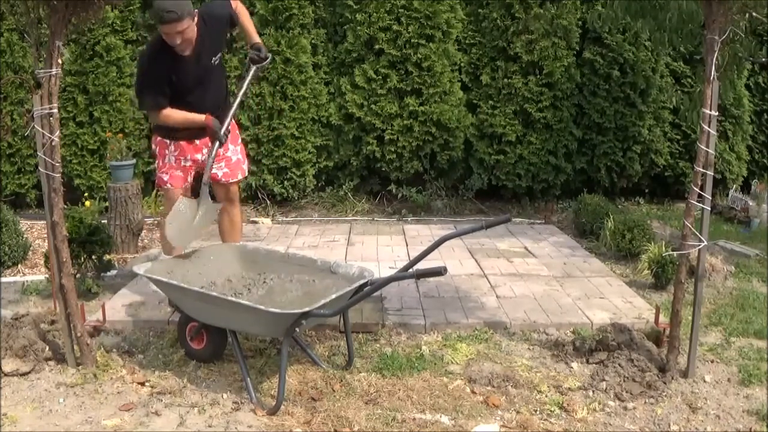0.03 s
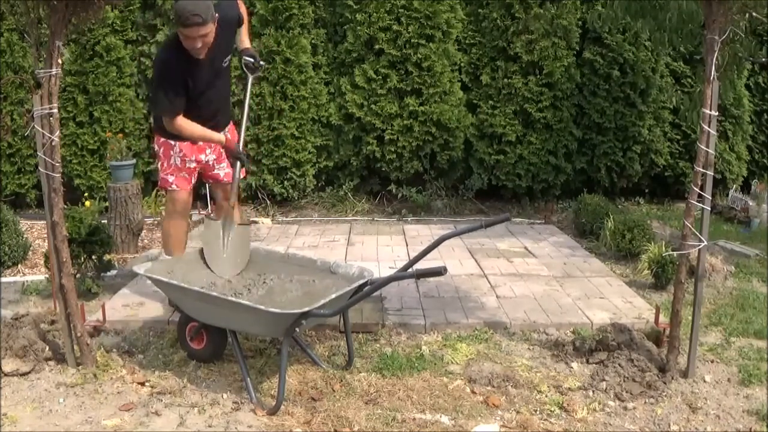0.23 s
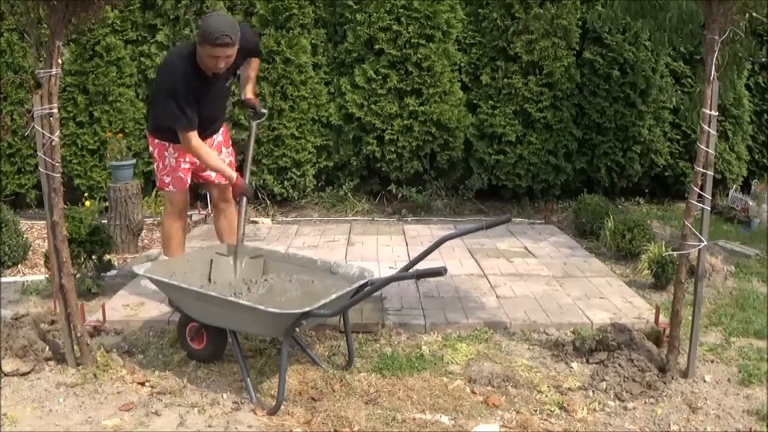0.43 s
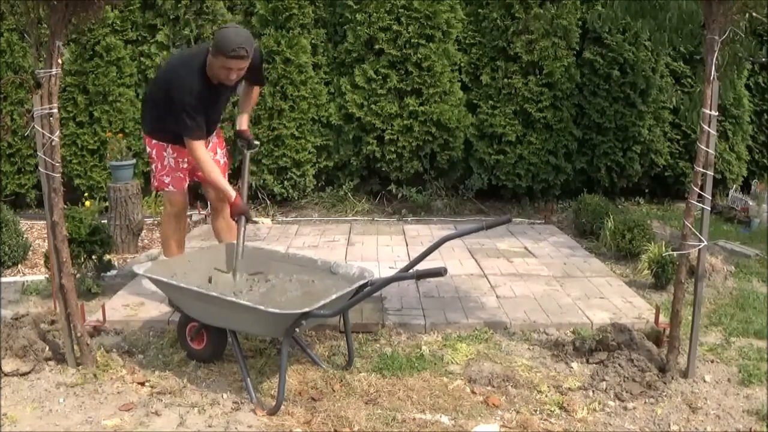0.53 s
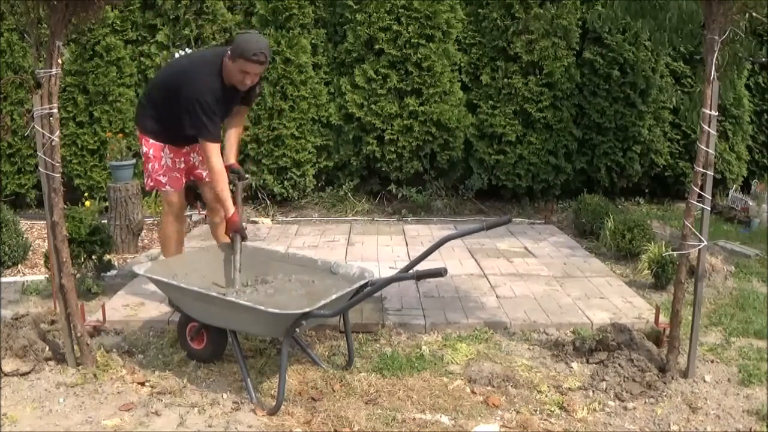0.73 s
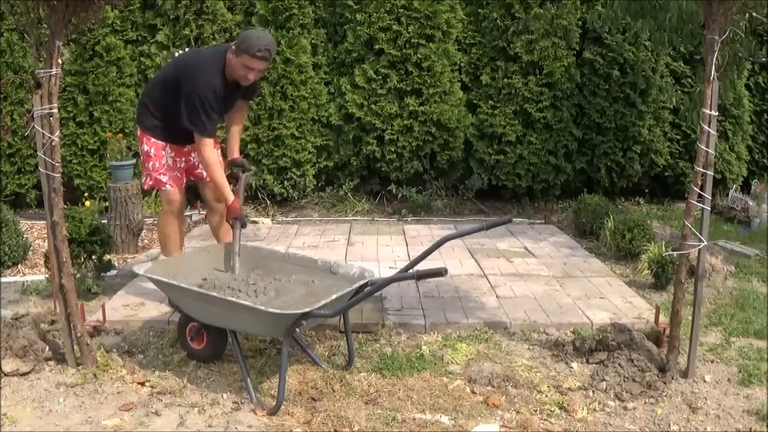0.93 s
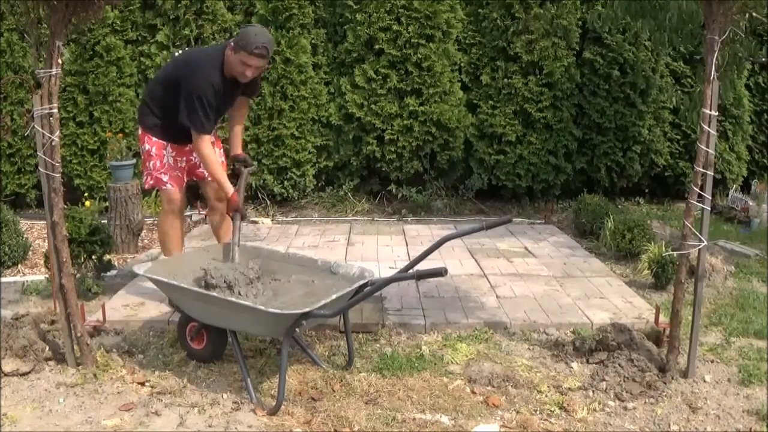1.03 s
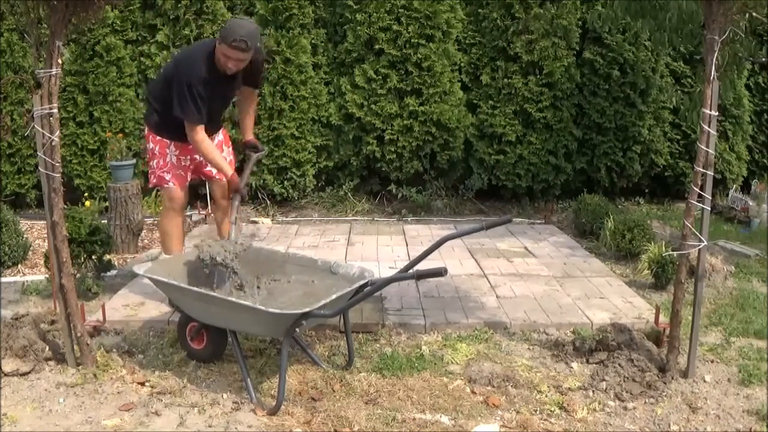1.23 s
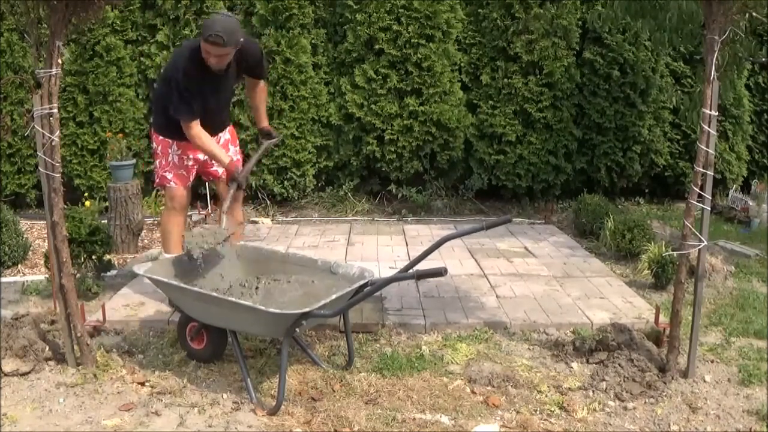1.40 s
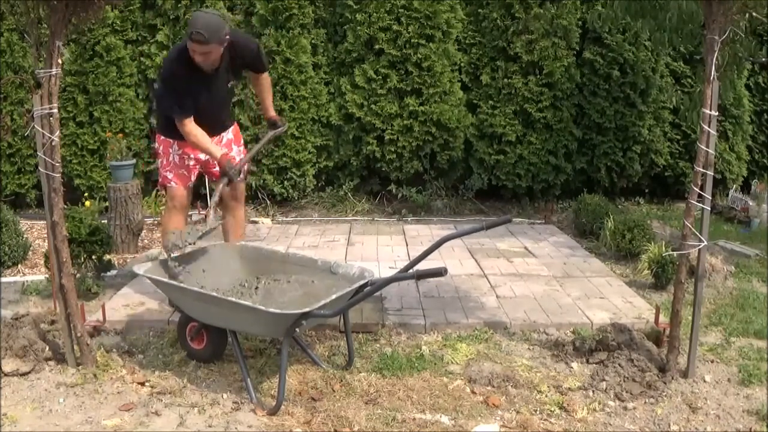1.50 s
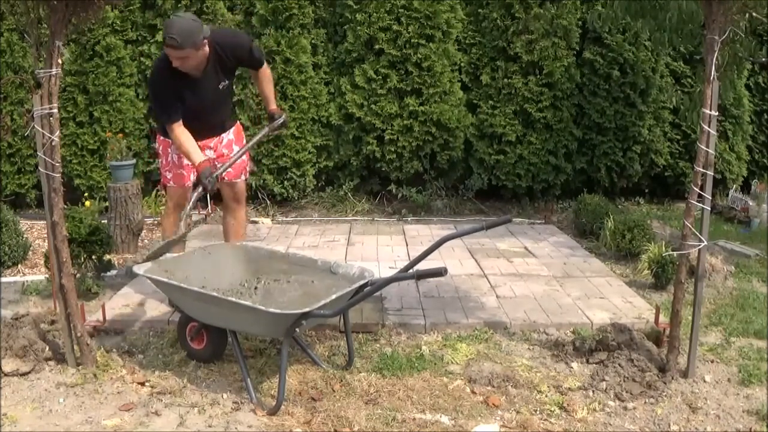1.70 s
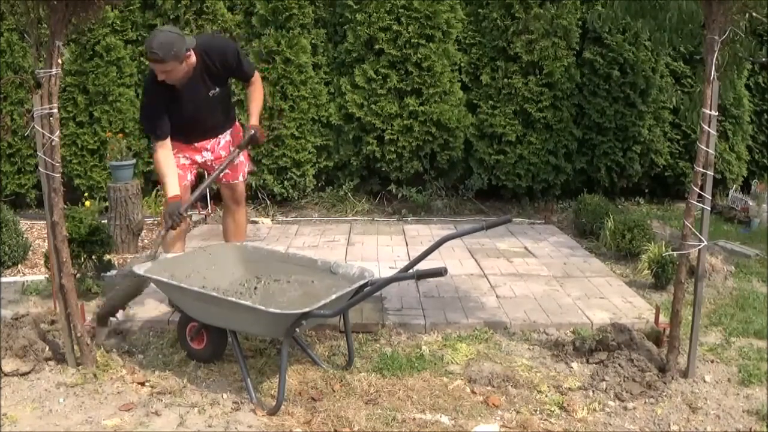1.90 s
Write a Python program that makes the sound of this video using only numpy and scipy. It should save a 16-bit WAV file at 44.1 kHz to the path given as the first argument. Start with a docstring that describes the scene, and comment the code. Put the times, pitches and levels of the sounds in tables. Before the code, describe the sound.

A steel shovel scrapes gritty wet concrete in a wheelbarrow, then lumps slap and knock back

```python
"""Shovel in wet concrete

A steel shovel stabs into wet concrete in a wheelbarrow and drags through it. Grit rasps on the blade as
clumpy noise, and an air pocket behind it gulps in short tone bursts that rise a little, then sink.
The mix keeps trickling as soft noise; lumps and stones slap back as noise bursts with ringing tray thuds.
Around it lie a short yard echo and a garden: hiss, birds made of wavering tones, and a faint sinking hum.
"""
import sys
import numpy as np
from scipy import signal
from scipy.fft import rfft, irfft, next_fast_len
from scipy.io import wavfile
from scipy.ndimage import uniform_filter1d, map_coordinates

SR = 44100
rng = np.random.default_rng(int(sys.argv[2]) if len(sys.argv) > 2 else 0)


def master_out(mix):
    """Clip the mix to full scale and print it as 16-bit PCM to the path in sys.argv[1]."""
    frames = np.transpose(np.atleast_2d(mix))
    ceiling = np.clip(frames, -1, 1)
    pcm = np.round(ceiling * 32767).astype(np.int16)
    wavfile.write(sys.argv[1], SR, pcm)


def linear_from_db(decibels):
    """Turn decibels (scalar or array-like) into linear amplitude factors; 0 gives 1."""
    return 10 ** (np.asarray(decibels, float) / 20)


N = 85995  # length of the sound in samples

# The shovel stroke: start_s, grit_level_db, treble_over_grit_db, pocket_over_grit_db, pocket_pitch_hz
STROKE = [(.211, -42, -17, -12, 744), (.2155, -27, 15, -56, 760), (.223, -18.5, 3, -46, 760),
          (.243, -27.5, 9.5, -46, 770), (.27, -21.5, 4.5, -17, 790), (.313, -17.5, -1, -10, 814),
          (.337, -20.5, 2, -2.5, 844), (.378, -25, -6.5, -3, 740), (.395, -20.5, 2.5, -2, 735),
          (.412, -27, -2, 9, 719), (.44, -21, -3.5, 2.5, 672), (.473, -24.5, 5, -4.5, 578),
          (.49, -21.5, -4.5, -6.5, 642), (.543, -26.5, -1, -2, 610), (.613, -29.5, 1, -1, 467),
          (.679, -26.5, -4.5, -7.5, 538), (.7, -33.5, -0.5, -2.5, 504), (.737, -48.5, -14, 4, 497)]
# The mix sliding off the blade: start_s, level_db, low_part_over_it_db
TRICKLE = [(.55, -79, 6), (.65, -39, 0), (.74, -48.5, 11), (.82, -43.5, 3), (.95, -46.5, 6.5),
           (1.03, -47, -7), (1.08, -44.5, -12), (1.21, -45, -13), (1.36, -51, -12), (1.55, -46, 8),
           (1.63, -52, -4), (1.72, -54.5, -5), (1.8, -53, -12), (1.95, -36, -31)]
# Tone colours of the grit, its dull scuff, the finer sand, the wet fizz and the low slop:
# pitch_hz, level_db (per Hz)
GRIT_COLOUR = [(700, -12.5), (1100, 3.5), (1350, 1), (2000, 2.5), (3000, 3), (4440, -3.5), (5600, -12),
               (7000, -68)]
SCUFF_COLOUR = [(150, -28), (240, -8), (450, -1), (1000, 0), (1500, -25)]
SAND_COLOUR = [(3500, -9), (5400, -1), (6000, -4.5), (10300, 0), (11300, -10)]
FIZZ_COLOUR = [(800, -13), (1300, -8), (2300, -2.5), (4500, -6), (8000, -7.5), (10500, -2.5), (11300, -22)]
SLOP_COLOUR = [(130, -35), (250, -7), (330, 5), (430, -4), (540, 1.5), (690, -2), (860, -3.5), (1800, -4),
               (3000, -46)]
# Resonances of the damped blade: pitch_hz, width_hz, lift_db
BLADE_RESONANCES = [(2450, 90, 5), (3750, 90, 5), (4250, 200, 6), (5400, 80, 5)]
# The blade's ring climbs as the mix shortens its free part: time_s, pitch_hz, level_db
BLADE_RING = [(.225, 1800, -40), (.245, 1850, -29), (.295, 2110, -27), (.37, 2320, -36)]
# Single gulps of the air pocket: peak_time_s, peak_level_db, pitch_hz
GULPS = [(.336, -9, 772), (.359, -15, 710), (.4225, -5.5, 682), (.458, -9, 559), (.688, -21.5, 502)]
# Slaps and catching stones: start_s, noise_level_db (before its fade), length_s, t60_s (fade by 60 dB),
# thud_level_db (before halving), brightness_db (per octave)
SLAPS = [(.2155, -25, .004, .03, -30, 0), (.356, -24, .003, .02, -45, 0), (.393, -25, .004, .02, -45, 1),
         (1.2665, -41, .004, .025, -48, 1), (1.324, -41, .009, .025, -50, 1),
         (1.376, -33, .0008, .008, -58, 4), (1.378, -37, .003, .03, -58, 4),
         (1.4045, -25, .004, .03, -30, -1.5), (1.452, -40, .004, .02, -55, 3),
         (1.4797, -22, .005, .03, -11, 0), (1.49, -32, .01, .04, -32, -1), (1.524, -37, .009, .04, -42, 0),
         (1.539, -23, .005, .03, -30, 0), (1.545, -22.5, .011, .035, -30, 0),
         (1.576, -26, .006, .02, -45, 0), (1.589, -28, .003, .012, -45, 1),
         (1.601, -33, .003, .012, -48, 2), (1.647, -33, .004, .03, -32, 0),
         (1.654, -17.5, .0012, .016, -48, 1.5), (1.918, -29, .0015, .015, -50, 2),
         (1.947, -24, .004, .03, -46, 1)]
# Tone colour of the slaps: pitch_hz, level_db
SLAP_COLOUR = [(400, -5), (900, -8.5), (2000, -6), (2700, -2), (4800, -4.5), (6000, -2.5), (11300, -10.5)]
# Ringing tones of the loaded tray: pitch_hz, level_db, t60_s
TRAY_TONES = [(191, -12, .1), (440, 0, .035), (730, 2, .03), (930, -4, .03), (1230, -3, .03)]
# Bird notes: warble (share of pitch), then rows of time_s, pitch_hz, level_db (before panning)
BIRDS = [(.003, [(0, 4215, -50), (.04, 4260, -55), (.085, 4610, -58), (.112, 4720, -52),
         (.128, 4900, -66)]), (.012, [(.01, 8150, -70), (.022, 8140, -52), (.05, 8050, -61),
         (.12, 7700, -62), (.21, 8330, -58)]), (.003, [(0, 3720, -63), (.145, 3600, -67), (.17, 3620, -56),
         (.21, 3740, -54)]), (.01, [(.08, 2650, -66), (.1, 2680, -61), (.21, 2900, -61)]),
         (.01, [(1.33, 3400, -64), (1.36, 3400, -55), (1.44, 3400, -56), (1.47, 3400, -66)]),
         (.008, [(1.42, 8200, -70), (1.43, 8200, -49), (1.46, 8150, -52), (1.535, 8200, -50),
         (1.55, 8200, -70)]), (.03, [(1.74, 7900, -62), (1.765, 7000, -54), (1.775, 6400, -52),
         (1.795, 6750, -49), (1.81, 7130, -48), (1.86, 6950, -47), (1.885, 7150, -49), (1.9, 7150, -70)])]
# A faint sinking hum: time_s, pitch_hz, level_db
HUM = [(.72, 155, -76), (.81, 137, -65), (.88, 124, -69), (1, 107, -71)]
# Tone colour of the garden hiss: pitch_hz, level_db (per Hz)
GARDEN_COLOUR = [(20, -36), (50, -13.5), (130, -8.5), (390, -7), (1000, -3.5), (2310, -1.5), (3570, -1),
                 (5810, -5.5), (8100, -6), (11300, -23.5)]

SCUFF_DB, SLOP_DB = -12, -5  # scuff against grit; slop against fizz, before the table's low part
GULP_CYCLES, POCKET_CYCLES = 4.966, 4.12  # length of one burst, in cycles of its tone
POCKET_RATE_HZ, POCKET_SPREAD = 220, 0.078  # bursts a second; random spread of pitch as a share
SLAP_RISE_S, THUD_RISE_S = 0.000043, 0.00037
TILT_FROM_HZ, TILT_ABOUT_HZ = 1000, 3500  # slap brightness is flat below the first, zero at the second
TRILL_RATE_HZ = 270
GARDEN_DB, GARDEN_ALIKE = -50, 0.71  # middle level of the hiss; likeness of the two ears (1 = same)
BARROW_PAN_DB, BIRD_PAN_DB = 1, -10  # left ear over right
LOW_CUT_HZ, TOP_HZ = 308, 11000
YARD_DB, YARD_T60_S, YARD_BRIGHT_DB = -13, .12, 0.5  # brightness in dB per octave, well above the low cut


def unit(x):
    """Scale a sound to an rms of 1."""
    return x / np.sqrt(np.mean(x ** 2) + 1e-20)


def along(points, hz):
    """Read a (pitch, value) table at any pitch, on a log axis."""
    table_hz, values = np.transpose(points)
    return np.interp(np.log(hz + 1), np.log(table_hz + 1), values)


def curves(rows):
    """Draw each column after the time as a curve, one value per sample."""
    times, *columns = np.transpose(rows)
    return [np.interp(np.arange(N) / SR, times, column) for column in columns]


def inside(rows):
    """Mark the samples between a table's first and last time."""
    t = np.arange(N) / SR
    return (t >= rows[0][0]) & (t <= rows[-1][0])


def wobble(rate):
    """Draw a smooth random curve with rate knots a second, at most 400."""
    knots = rng.standard_normal(int(N * 400 / SR) + 4)
    return map_coordinates(knots, [np.arange(N) * min(rate, 400) / SR])


def filtered(x, response):
    """Scale each frequency of a sound by response(hz)."""
    size = next_fast_len(x.shape[-1] + 8192)
    spectrum = rfft(x, size) * response(np.fft.rfftfreq(size, 1 / SR))
    return irfft(spectrum, size)[..., :x.shape[-1]]


def add(out, start_s, sound):
    """Lay a sound into out at a given time."""
    part = out[round(start_s * SR):][:len(sound)]
    part += sound[:len(part)]


def sides(pan_db):
    """Give the gains of the left and right ear, pan_db apart."""
    return linear_from_db(np.array([[.5], [-.5]]) * pan_db)


def blade(hz):
    """Lift the broad bands where the damped blade resonates."""
    return linear_from_db(sum(db / (1 + (2 * (hz - centre) / width) ** 2) for centre, width, db in BLADE_RESONANCES))


def grit(colour, spiky_db, clump_db, clump_rate):
    """Many tiny contacts of uneven size that come in clumps, heard through the blade; rms 1."""
    size_db = spiky_db * rng.exponential(size=N)
    size_db = size_db + clump_db * wobble(clump_rate)
    size_db = size_db + .5 * clump_db * wobble(clump_rate / 4)  # slower clumps
    contacts = rng.standard_normal(N) * linear_from_db(size_db)
    return unit(filtered(contacts, lambda hz: linear_from_db(along(colour, hz)) * blade(hz)))


def patchy(x, depth_db):
    """Make small patches of time and pitch randomly louder or softer; rms 1."""
    z = signal.stft(x, nperseg=256)[2]
    field = uniform_filter1d(rng.standard_normal(z.shape), size=4, axis=0)
    field = uniform_filter1d(field, size=6, axis=1)
    return unit(signal.istft(z * linear_from_db(depth_db * unit(field)), nperseg=256)[1][:N])


def burst(hz, cycles, turn):
    """A few cycles of a tone that swell and die; the swell peaks after three quarters of them."""
    u = np.arange(1200) / SR * hz  # time counted in cycles
    swell = np.exp(-2 * (2 * u / cycles - 1.5) ** 2)
    return swell * np.sin(2 * np.pi * (u + turn))


def tone(rows, waver_hz, rate, flutter_db, trill_hz=0):
    """A sine along a table of time, pitch and level, wavering at random, with an optional regular trill."""
    hz, db = curves(rows)
    hz = hz + waver_hz * wobble(rate)
    hz = hz + trill_hz * np.sin(2 * np.pi * TRILL_RATE_HZ * np.arange(N) / SR)
    level = np.sqrt(2) * linear_from_db(db + flutter_db * wobble(rate))  # root 2 turns rms into peak
    return inside(rows) * level * np.sin(2 * np.pi * np.cumsum(hz) / SR)


def scrape():
    """Grit and sand rasp on the ringing blade; the air pocket behind it answers in short low gulps."""
    grit_db, treble_db, pocket_db, pocket_hz = curves(STROKE)
    on = inside(STROKE)
    rasp = grit(GRIT_COLOUR, spiky_db=1.5, clump_db=2, clump_rate=250)
    rasp = rasp + linear_from_db(treble_db) * grit(SAND_COLOUR, spiky_db=1.2, clump_db=1.8, clump_rate=220)
    rasp = patchy(rasp, depth_db=2.5)
    rasp = rasp + linear_from_db(SCUFF_DB) * grit(SCUFF_COLOUR, spiky_db=2, clump_db=1, clump_rate=80)
    pocket = air_pocket(pocket_hz)
    pocket = pocket / np.sqrt(np.mean(pocket[on] ** 2))
    out = on * linear_from_db(grit_db) * (rasp + linear_from_db(pocket_db - 1.5) * pocket)
    for peak_s, db, hz in GULPS:
        start_s = peak_s - 0.744 * GULP_CYCLES / hz  # begin early so the peak falls on time
        add(out, start_s, linear_from_db(db) * burst(hz, GULP_CYCLES, rng.uniform()))
    return out + tone(BLADE_RING, 62, rate=140, flutter_db=1.5)


def air_pocket(hz):
    """A quick, uneven run of short tone bursts, each near the pitch the pocket has at that moment."""
    out = np.zeros(N)
    for k, (late, tune, size_db, turn) in enumerate(rng.standard_normal((400, 4))):
        start_s = STROKE[0][0] + (k + 1 + 0.388 * late) / POCKET_RATE_HZ
        if start_s < STROKE[-1][0]:
            burst_hz = hz[round(start_s * SR)] * np.exp(POCKET_SPREAD * tune)
            add(out, start_s, linear_from_db(size_db) * burst(burst_hz, POCKET_CYCLES, turn))
    return out


def trickle():
    """The mix fizzes and slops as it slides: patchy bright noise over clumpy low noise."""
    level_db, low_db = curves(TRICKLE)
    fizz = patchy(grit(FIZZ_COLOUR, spiky_db=2, clump_db=2, clump_rate=150), depth_db=3.5)
    slop = grit(SLOP_COLOUR, spiky_db=2.5, clump_db=1.5, clump_rate=55)
    return linear_from_db(level_db) * (fizz + linear_from_db(SLOP_DB + low_db) * slop)


def slaps():
    """Each lump or stone spatters as noise for its length, then fades, and thuds the loaded tray."""
    out, t = np.zeros(N), np.arange(SR // 8) / SR
    for start_s, db, length_s, t60_s, thud_db, bright_db in SLAPS:
        def colour(hz):
            octaves = np.log2(np.maximum(hz, TILT_FROM_HZ) / TILT_ABOUT_HZ)
            return linear_from_db(along(SLAP_COLOUR, hz) + bright_db * octaves) * blade(hz)

        spatter = rng.standard_normal(len(t)) * linear_from_db(1.8 * rng.exponential(size=len(t)))
        spatter = unit(filtered(spatter, colour))
        shape = (1 - np.exp(-t / SLAP_RISE_S)) * linear_from_db(-60 * np.maximum(t - length_s, 0) / t60_s)
        add(out, start_s, linear_from_db(db) * shape * spatter + linear_from_db(thud_db) / 2 * tray_thud(t))
    return out


def tray_thud(t):
    """The struck tray rings in a few dying tones, each a little louder or softer every time."""
    ring = np.zeros(len(t))
    for hz, db, t60_s in TRAY_TONES:
        ring += linear_from_db(db + rng.normal(0, 1) - 60 * t / t60_s) * np.sin(2 * np.pi * hz * t)
    return (1 - np.exp(-t / THUD_RISE_S)) * ring


def yard(x):
    """A short scatter off paving and hedge: fading noise as the echo, different for each ear."""
    t = np.arange(SR // 5) / SR
    tail = rng.standard_normal((2, len(t))) * linear_from_db(-60 * t / YARD_T60_S)
    tail = filtered(tail, lambda hz: linear_from_db(YARD_BRIGHT_DB * np.log2(1 + hz / LOW_CUT_HZ)))
    return signal.fftconvolve(x[None], tail / np.linalg.norm(tail[0]), axes=1)[:, :N]


def birds():
    """Each note is a sine that follows its pitch curve with a random waver and a fast regular trill."""
    out = np.zeros(N)
    for warble, note in BIRDS:
        trill_hz = warble * note[0][1]  # a share of the note's first pitch
        out += tone(note, trill_hz / 2.5, 300, flutter_db=3, trill_hz=trill_hz)
    return out * sides(BIRD_PAN_DB)


def garden_hiss():
    """Far hiss: two noises mixed so that the ears are partly alike, with a gently drifting level."""
    middle, side = filtered(rng.standard_normal((2, N)), lambda hz: linear_from_db(along(GARDEN_COLOUR, hz)))
    angle = np.arccos(GARDEN_ALIKE) / 2
    hiss = np.cos(angle) * middle + np.sin(angle) * side * np.array([[1], [-1]])
    return unit(hiss) * linear_from_db(GARDEN_DB + wobble(8))


def garden():
    """Far hiss, birds and a low wavering hum, added together."""
    return garden_hiss() + birds() + tone(HUM, 5, rate=40, flutter_db=2)


def scene():
    """The barrow stands a little left; its sound fades away below about 300 Hz."""
    barrow = scrape() + trickle() + slaps()
    barrow = filtered(barrow, lambda hz: 1 / (1 + (LOW_CUT_HZ / (hz + 1)) ** 3))
    return barrow * sides(BARROW_PAN_DB) + linear_from_db(YARD_DB) * yard(barrow) + garden()


def top_cut(x):
    """Nothing passes above the cut-off."""
    return signal.sosfilt(signal.butter(12, 11940, fs=SR, output="sos"), x)


def record(dry):
    """A steep filter takes away nearly everything above the top pitch."""
    mix = filtered(dry, lambda hz: 1 / np.sqrt(1 + (hz / TOP_HZ) ** 120))
    return top_cut(mix)


dry = scene()
out = record(dry)
master_out(out)
```